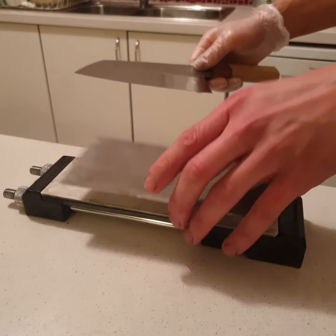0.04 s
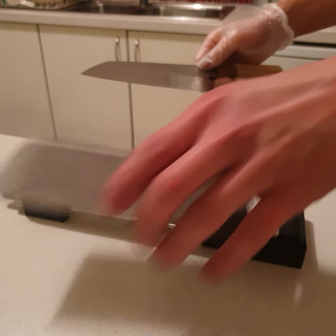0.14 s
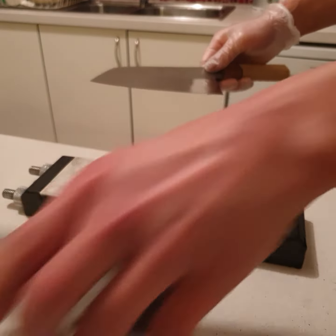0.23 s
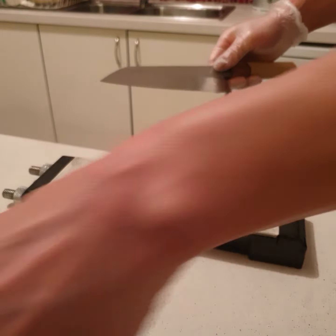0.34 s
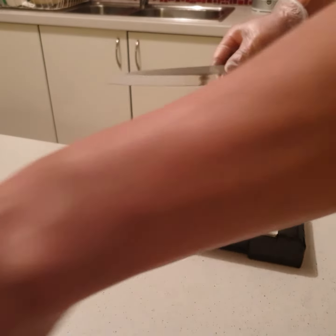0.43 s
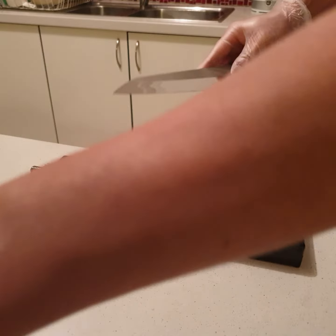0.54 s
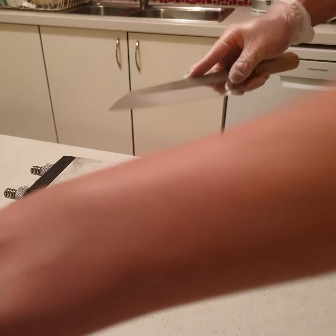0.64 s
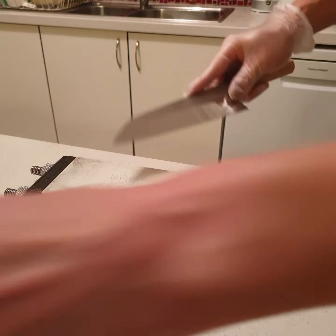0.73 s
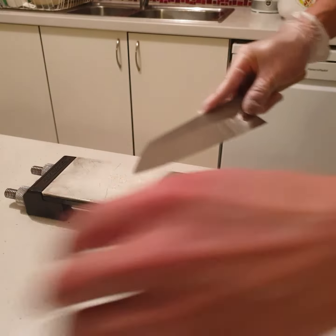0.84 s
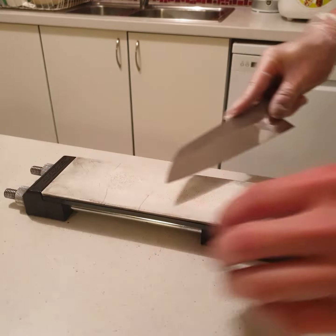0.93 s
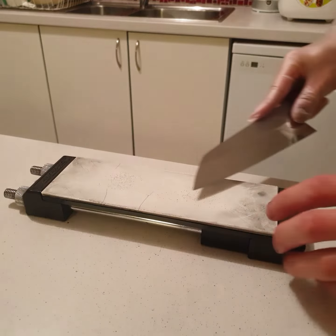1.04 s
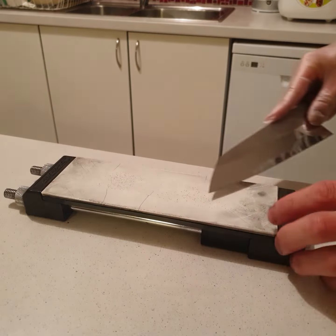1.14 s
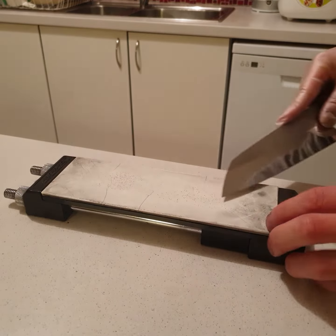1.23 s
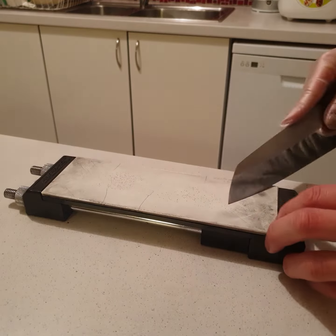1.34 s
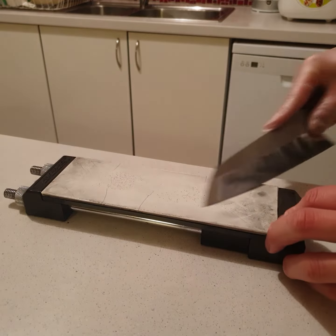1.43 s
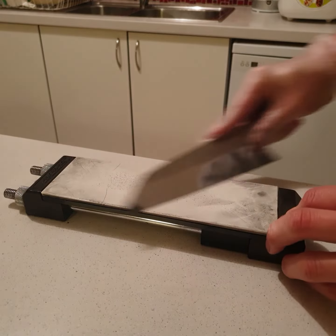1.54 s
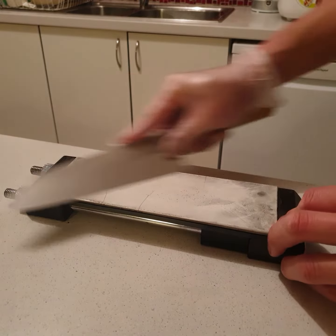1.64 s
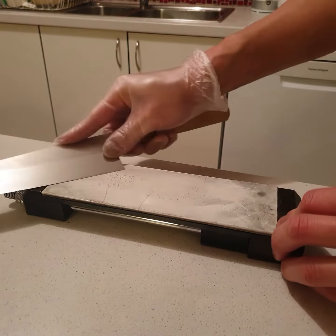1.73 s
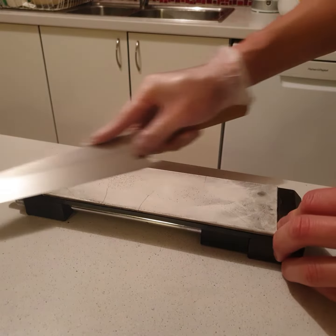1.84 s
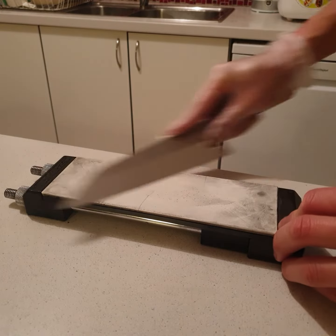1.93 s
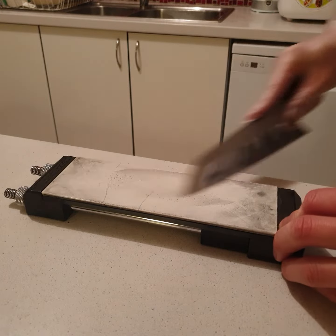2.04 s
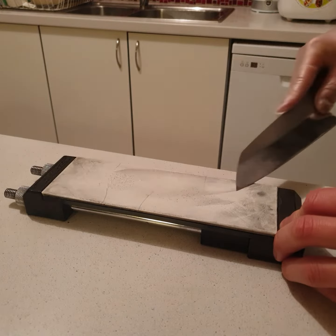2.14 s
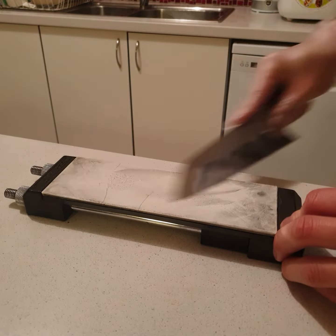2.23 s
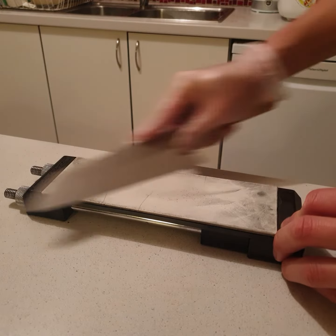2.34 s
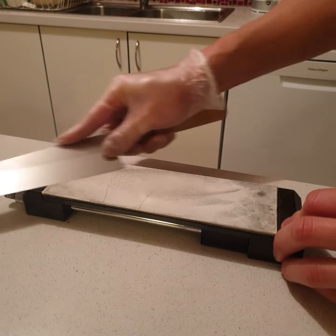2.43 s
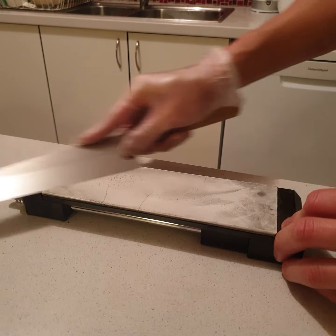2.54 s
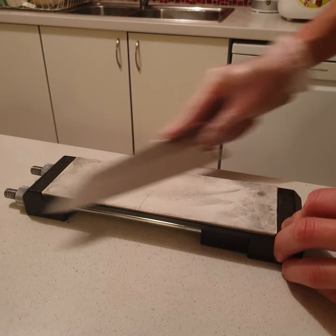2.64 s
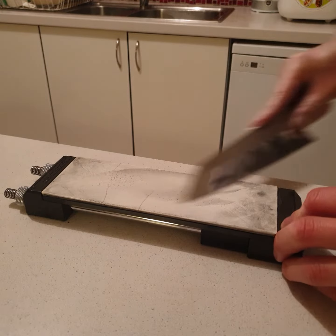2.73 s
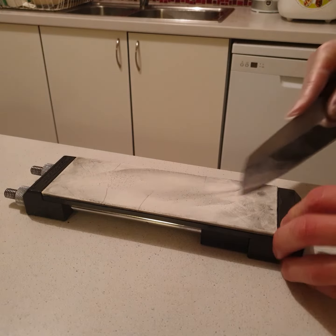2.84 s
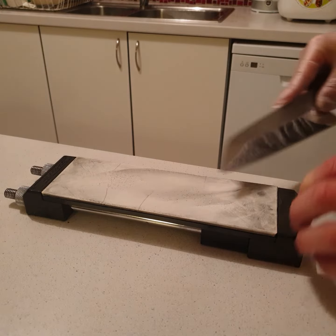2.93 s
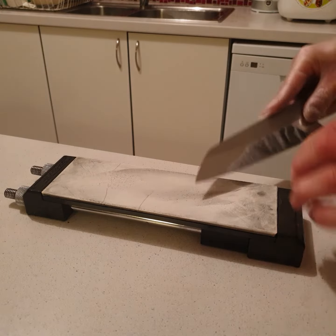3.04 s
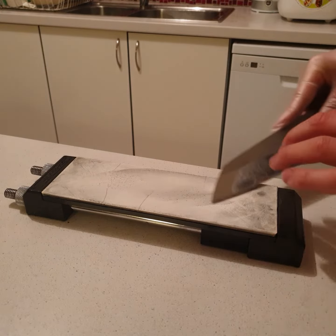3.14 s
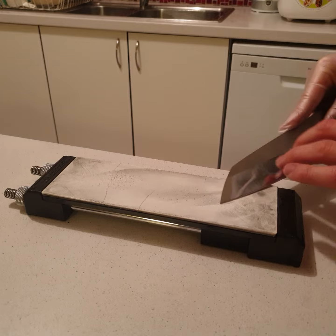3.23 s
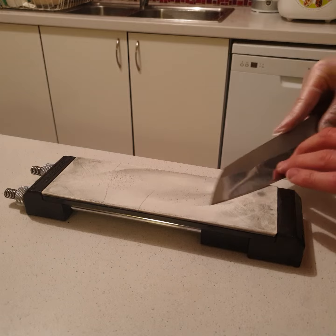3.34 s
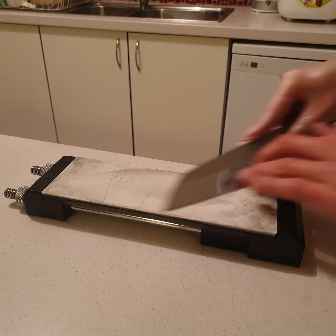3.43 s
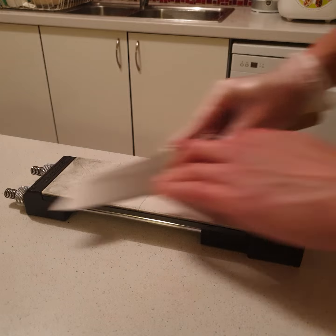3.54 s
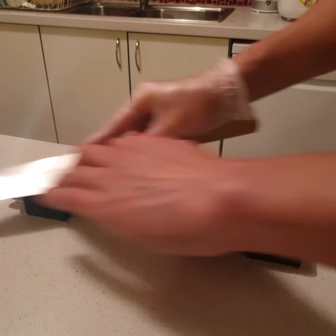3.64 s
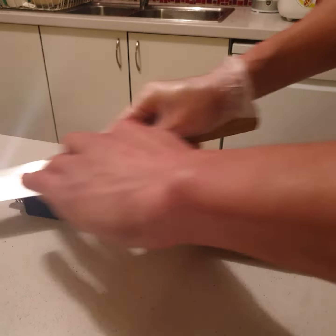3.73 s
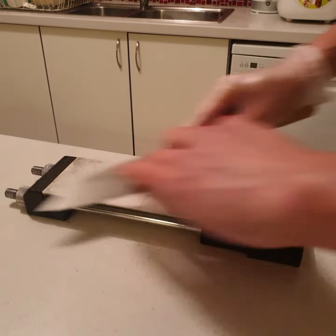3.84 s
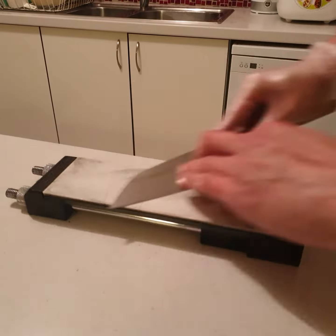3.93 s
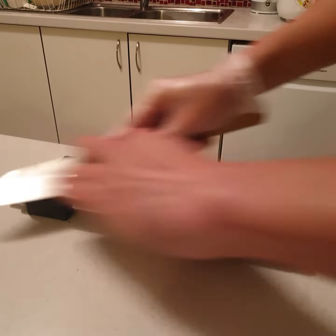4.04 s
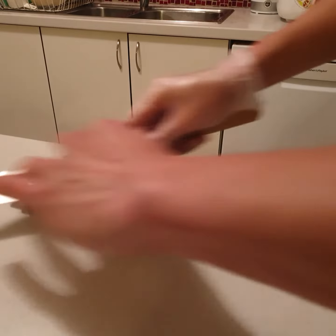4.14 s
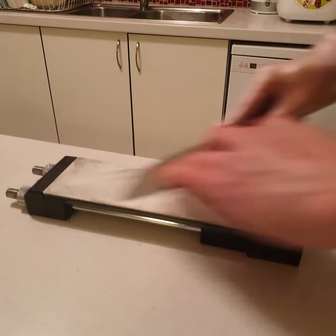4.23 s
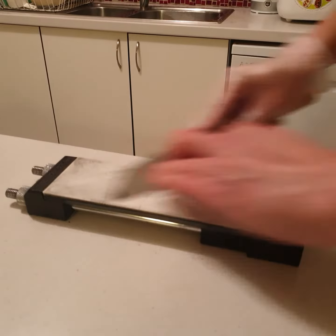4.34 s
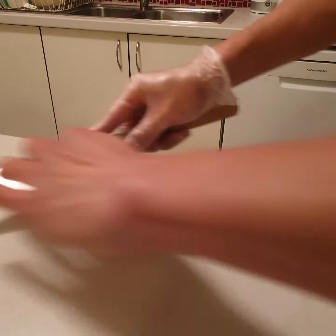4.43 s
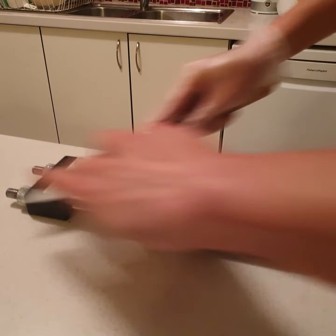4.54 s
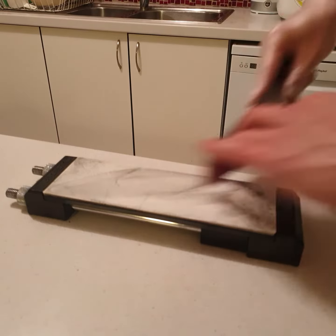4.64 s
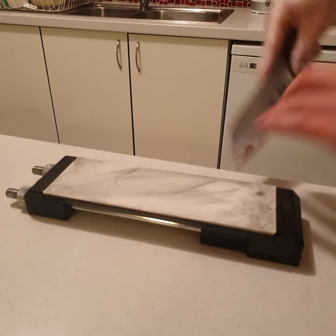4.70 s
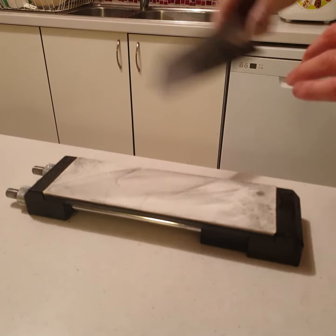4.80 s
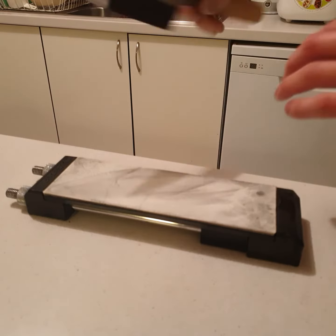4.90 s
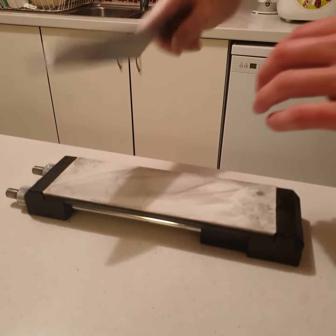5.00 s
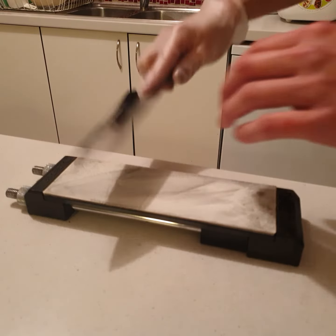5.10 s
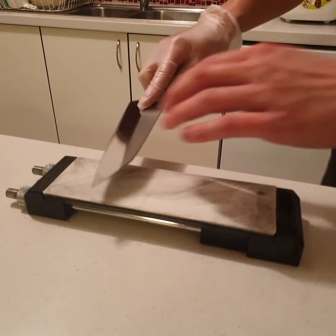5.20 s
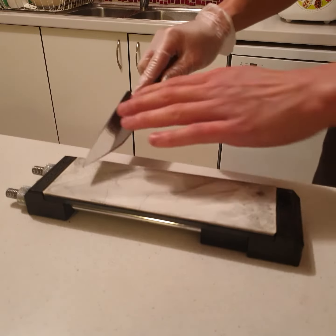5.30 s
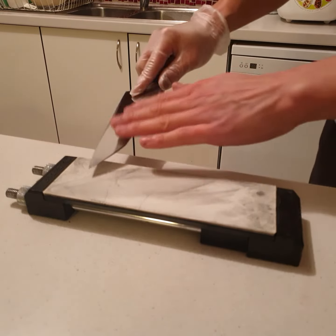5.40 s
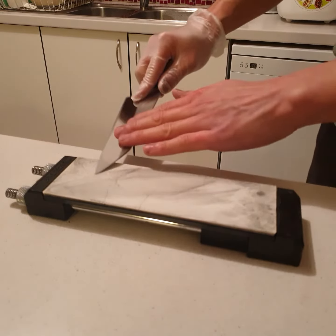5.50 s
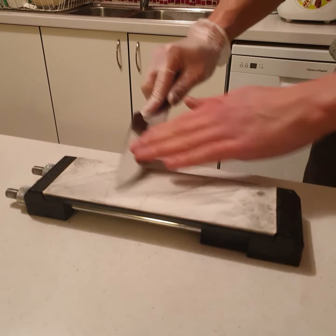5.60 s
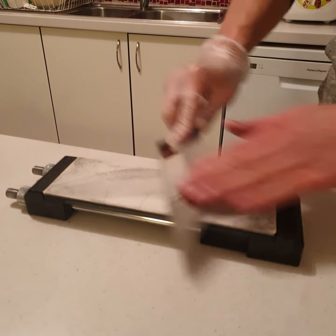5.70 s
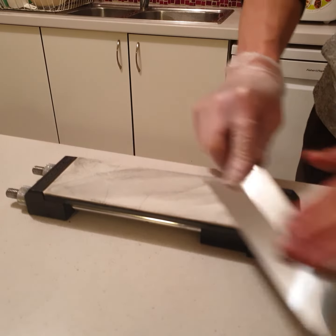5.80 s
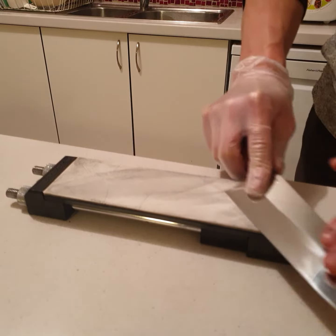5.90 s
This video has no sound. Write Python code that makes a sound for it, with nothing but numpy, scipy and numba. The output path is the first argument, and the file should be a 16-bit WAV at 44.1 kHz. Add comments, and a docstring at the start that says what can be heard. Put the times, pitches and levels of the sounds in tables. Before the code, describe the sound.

A faint low motor hum with slight airy hiss runs throughout a small kitchen with a short, diffuse echo. At about 0.5 s a steel plate strikes the counter on one edge, rings brightly and roughly, then claps flat by 0.6 s, choking the ring; a woody counter boom fades. It is by far the loudest event. Around 1.3 s a knife lightly touches a whetstone. Close, gritty strokes follow at about 1.6, 1.9, 2.3 and 2.6 s: bright hiss with thin metallic singing that glides up and back, plus small edge ticks. After a pause, from 3.45 to 4.7 s, strokes become quick and firm, about five per second, with dull holder bumps beneath. The blade lifts near 4.8 s; clothing rustles softly, with a low bump at 5.0 s. The edge touches down at 5.5 s, ticks at 5.7 s, and a strong short scrape peaks at 5.8 s before the end.

```python
"""Plate put down, knife on a whetstone

A steel flattening plate rings on one edge on a kitchen counter, then drops flat: decaying sines, noise chatter.
A knife is stroked over a whetstone: noisy grit force hisses and drives blade resonances that glide with each stroke.
The edge ticks (noise bursts), the stone's holder bumps (short sines, rumble) and clothes rustle (coloured noise).
An appliance hums (wavering sines, noise) in a small room (decaying noise echo).
"""
import sys
import numpy as np
from scipy import signal
from scipy.fft import rfft, irfft
from scipy.io import wavfile
from numba import njit

SR = 44100
rng = np.random.default_rng(int(sys.argv[2]) if len(sys.argv) > 2 else 0)


def wrap_up_sound(samples):
    """Save the sound to the file named by the first command line argument, as 16-bit audio."""
    columns = np.atleast_2d(samples).T
    # keep every value between -1 and 1, then stretch to whole-number steps
    tamed = np.clip(columns, -1, 1)
    steps = np.round(tamed * 32767).astype(np.int16)
    wavfile.write(sys.argv[1], SR, steps)


N = 262836


def from_db(db):
    """Decibels to gain."""
    return 10 ** (np.asarray(db) / 20)


def rms_one(x):
    """Scale to unit rms."""
    return x / np.sqrt(np.mean(x ** 2) + 1e-20)


def clock():
    """Time of each sample [s]."""
    return np.arange(N) / SR


def curve(rows):
    """Join (time [s], value) rows by straight lines."""
    return np.interp(clock(), *np.transpose(rows))


def at_hz(points, hz):
    """Read (frequency [Hz], value) rows on a log-frequency axis."""
    f, value = np.transpose(sorted(map(tuple, points)))
    return np.interp(np.log(hz + 1e-9), np.log(f), value)


def drift(rate_hz):
    """Random knots joined by straight lines, unit rms."""
    knots = rng.standard_normal(int(rate_hz * N / SR) + 2)
    return rms_one(np.interp(clock() * rate_hz, np.arange(len(knots)), knots))


def pan(db):
    """Left and right gain; db is left over right."""
    return from_db(np.array([[db], [-db]]) / 2)


def colour(x, spectrum):
    """Minimum-phase filter with the given spectrum; white noise keeps its power."""
    size = 2048
    hz = np.arange(size + 1) * SR / size / 2
    cepstrum = irfft(np.log(rms_one(from_db(at_hz(spectrum, hz)))))
    # fold to the causal half
    cepstrum[1:size] *= 2
    cepstrum[size + 1:] = 0
    impulse = irfft(np.exp(rfft(cepstrum)))
    return signal.fftconvolve(x, impulse[None], axes=1)[:, :N]


def bursts(rows):
    """Each contact is a dying noise chatter; rows start (time [s], level [dB], time per 20 dB [s])."""
    out = np.zeros((2, N))
    t = np.arange(SR // 10) / SR
    for s, db, length_s, *_ in rows:
        at = int(s * SR)
        out[:, at:at + len(t)] += from_db(db - 20 * t / length_s) * rng.standard_normal((2, len(t)))
    return out


def swell_db(start_s, hold_s, attack_s, release_s, sag_db=0):
    """Attack, sagging hold and release in dB; attack and release are times per 20 dB."""
    age = clock() - start_s
    slopes = np.maximum(-age, 0) / attack_s + np.maximum(age - hold_s, 0) / release_s
    return -20 * slopes - sag_db * np.clip(age / hold_s, 0, 1)


# motor lines: (frequency [Hz], relative rms level [dB])
HUM_LINES = [(99.6, -86), (174.8, -63), (199.7, -70), (301, -79.5), (349.5, -71), (419, -77.5)]
# motor loudness, shaded by the arms: (time [s], level [dB])
HUM_LEVEL = [(0, -4.5), (.45, 2), (1.2, -1.5), (2.6, 0.5), (3.2, 2), (4.4, 6), (5.96, 4)]
# spectra of motor rush and faint hiss: (frequency [Hz], relative density [dB per Hz])
MOTOR_SPECTRUM = [(25, -21.5), (60, -5.5), (115, -10), (155, 0.5), (230, -5), (300, 1), (410, -2.5),
                  (520, -11.5), (700, -17.5), (1200, -39.5), (2500, -41.5)]
AIR_SPECTRUM = [(530, -37.5), (900, -8), (1090, -6.5), (1720, -13), (2220, -11), (2730, -18.5),
                (5000, -17.5), (8150, -22.5), (14700, -13), (16000, -22)]


def appliance(motor_db=-65, air_db=-80, waver_db=0.5):
    """Sine lines waver in level and phase over a dull noise rush and faint hiss."""
    lines = 0
    for hz, db in HUM_LINES:
        gain = np.sqrt(2) * from_db(db + waver_db * drift(2.4))
        lines = lines + gain * np.sin(2 * np.pi * hz * clock() + .2 * drift(4.9))
    # partly common to both sides
    motor_noise = rng.standard_normal(N) + .35 * rng.standard_normal((2, N))
    rush = rms_one(colour(motor_noise, MOTOR_SPECTRUM))
    air = rms_one(colour(rng.standard_normal((2, N)), AIR_SPECTRUM))
    motor = (lines + from_db(motor_db) * rush) * from_db(curve(HUM_LEVEL)) * pan(1.2)
    return motor + from_db(air_db) * air


# plate meets counter: (time [s], relative level [dB], chatter time per 20 dB [s], share ringing the plate [0-1])
PLATE_HITS = [(0.5169, -13.5, 0.0065, 0.88), (0.5207, -8.5, 0.0085, 0.48), (0.5591, -19.5, 0.023, 0.67),
              (0.5792, -6, 0.0087, 0.67), (0.5831, -14.5, 0.016, .4), (0.5861, -18.5, 0.0071, .1)]
# last corner snaps down: (time [s], relative level [dB], time per 20 dB [s])
PLATE_SNAP = [(0.5926, -4.5, 0.0027)]
# free plate: (frequency [Hz], level [dB])
PLATE_MODES = [(996, -34), (1092, -34.5), (1556, -35.5), (1750, -41.5), (2616, -36), (3080, -40),
               (3528, -35), (3692, -35), (4622, -32.5), (4905, -33.5), (5477, -37), (5706, -34.5),
               (6020, -40), (6240, -38), (6722, -39), (7320, -41), (7635, -40), (10865, -35.5)]
# chatter spectrum: (frequency [Hz], relative density [dB per Hz])
CLACK_SPECTRUM = [(40, -25.5), (100, -17), (280, -4), (500, -2), (1500, -2.5), (2400, -5), (3200, -0.5),
                  (4300, -5), (6200, 2.5), (7500, -1.5), (8500, -13), (11500, -4.5), (16000, -16)]
# counter top: (frequency [Hz], level [dB], T60 before counter_t60_scale [s])
COUNTER_MODES = [(125, -51, 0.3), (172, -41, .3), (273, -27, 0.21), (287.5, -33, 0.39), (335.5, -42, 0.76),
                 (611.5, -48.5, 0.6), (678, -43, .35)]
# blows on the counter: (time [s], level [dB])
COUNTER_BLOWS = [(0.519, -7), (0.58, -9.5), (0.594, 0.5)]
PLATE_FLAT_S, PLATE_DAMPED_T60_S = .585, .05


def plate(clack_db=-4, ring_t60_s=0.95, snap_db=-4, snap_pan_db=12, counter_t60_scale=0.94):
    """The plate rings while it stands on an edge and is choked when it lies flat; the counter booms."""
    t = clock()[:SR * 3 // 2]
    ring, boom = np.zeros((2, N)), np.zeros(N)
    choke = from_db(-60 * np.maximum(t - PLATE_FLAT_S, 0) / PLATE_DAMPED_T60_S)
    for s, _, _, share in PLATE_HITS:
        age = np.maximum(t - s, 0)
        decay = share * (t > s) * from_db(-60 * age / ring_t60_s) * choke
        for hz, level_db in PLATE_MODES:
            phase = rng.uniform(0, 2 * np.pi) + rng.normal(0, .6, (2, 1))
            ring[:, :len(t)] += from_db(level_db) * decay * np.sin(2 * np.pi * hz * age + phase)
    for s, db in COUNTER_BLOWS:
        age = np.maximum(t - s, 0)
        for hz, level_db, t60_s in COUNTER_MODES:
            gain = from_db(db + level_db - 60 * age / (t60_s * counter_t60_scale))
            boom[:len(t)] += gain * np.sin(2 * np.pi * hz * age)
    clack = from_db(clack_db) * colour(bursts(PLATE_HITS), CLACK_SPECTRUM)
    snap_spectrum = [(500, -15.5), (5000, -7), (8500, -4.5), (11500, 2), (16000, -1)]
    snap = from_db(snap_db) * colour(bursts(PLATE_SNAP), snap_spectrum)
    thud = signal.sosfilt(signal.butter(2, 130, "high", fs=SR, output="sos"), boom)
    # the standing edge buzzes against the counter and roughens the ring
    ring = ring * from_db(2.2 * drift(320))
    return clack * pan(3) + thud + snap * pan(snap_pan_db), ring * pan(4.5)


# room decay: (frequency [Hz], T60 [s])
ROOM_T60 = [(100, .4), (300, 0.49), (1500, 0.54), (5000, 0.46), (8000, 0.33), (15000, 0.31)]


def kitchen(x, first_echo_s=0.003):
    """Diffuse echoes from cupboards and tiles: noise bands, the treble dying fastest."""
    t = np.arange(SR * 3 // 4) / SR
    white, tail = rfft(rng.standard_normal((2, len(t)))), 0
    hz, centres = np.fft.rfftfreq(len(t), 1 / SR), [f for f, _ in ROOM_T60]
    for weights, (_, t60_s) in zip(np.eye(len(centres)), ROOM_T60):
        band = irfft(white * np.interp(hz, centres, weights), len(t))
        tail = tail + band * from_db(-60 * t / t60_s)
    tail = tail * (t > first_echo_s)
    return signal.fftconvolve(x, tail / np.sqrt(np.sum(tail ** 2) / 2), axes=1)[:, :N]


@njit
def resonate(x, hz, width, sr):
    """Two-pole resonance with moving centre and width [Hz], unit gain on top."""
    y = np.zeros(len(x))
    for i in range(2, len(x)):
        r = 1 - np.pi * width[i] / sr
        drive = (1 - r * r) / 2 * (x[i] - x[i - 2])
        y[i] = drive + 2 * r * np.cos(2 * np.pi * hz[i] / sr) * y[i - 1] - r * r * y[i - 2]
    return y


def blade_mode(force, hz, width_hz):
    """One moving resonance swells and fades as the contact passes its nodes; white noise keeps its power."""
    swell = from_db(3.0 * drift(18))
    width = width_hz + np.zeros(N)
    sides = [resonate(side * swell, hz, width, SR) for side in force]
    return np.array(sides) / np.sqrt(np.pi * width / SR)


# strokes: (up to speed [s], hold [s], attack per 20 dB [s], relative hiss [dB], relative blade ring [dB],
#   sag over the hold [dB], damping of the lowest mode [dB], top of the glide [s], top of the glide [Hz])
STROKES = [(1.576, .13, 0.19, -43.5, -55, -2, -1, 1.635, 1480),
           (1.881, 0.21, 0.02, -49, -56.5, 7.5, -0.5, 1.975, 1493),
           (2.242, 0.049, .06, -57, -80, -2, 0, 2.24, 1050),
           (2.298, 0.14, 0.01, -47, -51.5, 3, 3.5, 2.335, 1516),
           (2.597, 0.2, .058, -44.5, -53, 10, -0.5, 2.675, 1507),
           (3.465, 0.082, .01, -49, -63.5, 1.5, -7, 3.43, 1290),
           (3.551, 0.068, .07, -48, -60, 1, -3.5, 3.605, 1590),
           (3.81, 0.091, 0.01, -44.5, -51.5, 1, -2.5, 3.845, 1690),
           (3.999, 0.083, 0.04, -44.5, -51, -0.5, -0.5, 4.04, 1640),
           (4.202, 0.075, 0.07, -46, -53, -1.5, 0.5, 4.25, 1640),
           (4.362, 0.089, .04, -40, -46.5, 4, 4, 4.41, 1590),
           (4.562, 0.13, 0.13, -43, -51.5, 1, 2, 4.595, 1610),
           (5.778, 0.044, .24, -38.5, -50, 1, 5.5, 5.8, 1543),
           (5.942, 0.036, 0.65, -55, -61, 0, -0.5, 5.96, 1410)]
# knife lies on the stone and drags lightly: (from [s], until [s], relative hiss [dB])
RESTS = [(1.337, 2.88, -70.5), (3.28, 4.8, -64.5), (5.486, 5.96, -66)]
LAND_S, LIFT_S = .006, .07  # per 20 dB
REST_RING_DB = -22  # blade ring relative to hiss
RELEASE_S, RELEASE_PER_HOLD = 0.046, 0.37  # per 20 dB; longer strokes run out more slowly
RING_STEEPNESS = 1.27  # dB of ring per dB of hiss: a light touch hardly bends the blade


def drag():
    """Gains of grit hiss and blade ring: each stroke swells out of the light drag of the resting knife."""
    touching = np.array([swell_db(start, end - start, LAND_S, LIFT_S) for start, end, _ in RESTS])
    hiss_levels = [db + touch for (*_, db), touch in zip(RESTS, touching)]
    ring_levels = [level + REST_RING_DB for level in hiss_levels]
    for start, hold, attack, hiss_db, ring_db, sag_db, *_ in STROKES:
        release = RELEASE_S + RELEASE_PER_HOLD * hold
        shape = swell_db(start, hold, attack, release, sag_db) + touching.max(axis=0)
        hiss_levels.append(hiss_db + shape)
        ring_levels.append(ring_db + RING_STEEPNESS * shape)
    # the loudest layer wins
    hiss, ring = np.max(hiss_levels, axis=0), np.max(ring_levels, axis=0)
    return from_db(hiss) + 1e-12, from_db(ring) + 1e-12


TURN_HZ = 1010  # lowest mode where the stroke turns round
GLIDE_S, GLIDE_PER_HOLD = .055, 0.18  # arch half width; longer strokes glide more slowly


def glide():
    """The lowest mode arches up and back as the contact travels the edge; ratio to its listed pitch."""
    arches = []
    for _, hold, *_, top_s, top_hz in STROKES:
        half_width = GLIDE_S + GLIDE_PER_HOLD * hold
        arches.append((top_hz - TURN_HZ) * np.exp(-((clock() - top_s) / half_width) ** 2))
    return (TURN_HZ + np.max(arches, axis=0)) / BLADE_MODES[0][0]


CLIMB_DB, CLIMB_PER_S = 3, 1.5  # limit of the gain change; glide rate that sets its slope


def lowest_mode_gain():
    """The lowest mode sings while its pitch climbs and is choked as it falls; damping varies by stroke."""
    damping_db = curve([(start, db) for start, *_, db, _, _ in STROKES])
    climb = np.gradient(glide()) * SR
    return from_db(CLIMB_DB * np.tanh(climb / CLIMB_PER_S) - damping_db)


# blade on the stone: (frequency [Hz], width [Hz], relative level [dB], share of the lowest mode's glide [0-1])
BLADE_MODES = [(1400, 55, 0, 1.0), (2020, 110, -1.5, .5), (2780, 110, -.5, .18), (3430, 180, -.5, .25),
               (4220, 220, 4.5, .14)]


def low_modes(force):
    """Bending modes rise as the stone pins the edge and jitter as it rocks; a little grit sounds between."""
    shift = glide()
    rock, grit_share = .011, .2
    modes = []
    for hz, width_hz, db, follow in BLADE_MODES:
        moving_hz = hz * shift ** follow * (1 + rock * drift(35))
        modes.append(from_db(db) * blade_mode(force, moving_hz, width_hz))
    ring = lowest_mode_gain() * modes[0] + sum(modes[1:])
    grit = signal.sosfilt(signal.butter(2, [1700, 4800], "band", fs=SR, output="sos"), force)
    both = ring / np.linalg.norm(from_db(np.array(BLADE_MODES)[:, 2])) + grit_share * grit
    # the narrow blade radiates little bass
    return signal.sosfilt(signal.butter(3, 900, "high", fs=SR, output="sos"), both)


# steel grinding on grit: (frequency [Hz], relative density [dB per Hz])
GRIT_SPECTRUM = [(200, -30), (2300, -30), (3400, -13), (4700, -4.5), (7000, -.5), (8400, -8), (11500, -4),
                 (13500, -4.5), (16000, -7.5)]


def high_modes(force, tip_bright_db=5, count=20):
    """Upper modes ring bright and clear under the tip and blur into hiss as the whole edge lies down."""
    free_width_hz, damping_hz, grit_share = 70, 360, .75
    contact, shift = curve(CONTACT), glide()
    centres_hz = np.linspace(4700, 15500, count) + rng.uniform(-200, 200, count)
    follow = rng.uniform(.08, .24, count)
    width_hz, ring = free_width_hz + damping_hz * contact ** 2, 0
    for hz, pull in zip(centres_hz, follow):
        moving_hz = hz * shift ** pull * (1 + .022 * contact * drift(30))
        gain = from_db(tip_bright_db * (1 - contact) * np.log2(hz / centres_hz.mean()))
        # waves run along the blade before they radiate, so the modes do not line up
        travel = rng.integers(0, SR // 1000)
        delayed = np.pad(gain * force, ((0, 0), (travel, 0)))[:, :N]
        ring = ring + blade_mode(delayed, moving_hz, width_hz)
    grit = grit_share * (.5 + .5 * contact) * force
    return colour(ring / np.sqrt(count) + grit, GRIT_SPECTRUM)


# edge on the stone: (time [s], share [0 = tip only, 1 = whole edge])
CONTACT = [(1.54, 0.081), (1.6, 0.62), (2.05, .9), (2.09, 0), (2.26, 0), (2.33, 0.79), (2.78, 0.8),
           (2.87, .13), (3.46, 0.097), (3.54, 0.67), (4.7, .8), (5.8, 0.6)]
# edge touches or catches on the stone: (time [s], relative level [dB], time per 20 dB [s])
TICKS = [(1.3375, -60, 0.02), (1.556, -32.5, .034), (1.582, -30, .018), (1.8763, -43, 0.036),
         (2.0873, -37.5, 0.038), (2.2889, -32.5, 0.027), (2.4415, -35.5, .01), (2.5652, -47, .016),
         (2.7064, -31, .0045), (2.852, -48, 0.033), (3.2811, -58, .02), (3.4595, -29.5, 0.0096),
         (3.5545, -25.5, 0.0035), (3.8029, -34, 0.013), (3.98, -38, .013), (4.3696, -26, 0.011),
         (4.7787, -44.5, 0.034), (4.8121, -42, .012), (5.4871, -37, 0.01), (5.7071, -28, 0.0064),
         (5.728, -34, .012)]


def knife(hiss_db=-2.5, ring_db=-1.0, tick_db=-5.5, tick_ring_db=-15, tip_pan_db=-6, edge_pan_db=1.1):
    """Grains break under the edge; the drag judders and shakes the blade. The tip touches on the right."""
    grains_per_s, grain_spread_db, grain_share, judder_db = 1500, 3.0, .6, 1.3
    grain_gain = from_db(grain_spread_db * np.minimum(rng.exponential(1, N), 4))
    grains = (rng.random(N) < grains_per_s / SR) * grain_gain
    rough = rng.standard_normal((2, N)) * (1 + grain_share * rms_one(grains))
    force = rms_one(rough) * from_db(judder_db * drift(130))
    hiss, ring = drag()
    contact, ticks = curve(CONTACT), bursts(TICKS)
    treble = high_modes(from_db(hiss_db) * hiss * force + from_db(tick_db) * ticks)
    # a light touch of the tip hardly bends the blade
    bending_ticks = from_db(tick_ring_db) * (0.13 + contact) * ticks
    bending = low_modes(from_db(ring_db) * ring * force + bending_ticks)
    balance_db = tip_pan_db + (edge_pan_db - tip_pan_db) * contact
    return (treble + bending * pan(-1.3)) * from_db(np.array([balance_db, -balance_db]) / 2)


# holder bumps on the counter, hardest where quick strokes turn: (time [s], level [dB], frequency [Hz])
BUMPS = [(1.345, -47, 200.5), (1.42, -41.5, 126), (2.167, -43.5, 148), (2.53, -50, 150),
         (3.524, -36.5, 200), (3.596, -39.5, 200), (3.902, -37.5, 202), (3.956, -33.5, 165),
         (4.137, -26, 196), (4.322, -28.5, 180), (4.501, -29.5, 181), (5.018, -38.5, 89), (5.494, -44, 150),
         (5.919, -43, 162)]
RUMBLE_T60_S, RUMBLE_AT_HZ, RUMBLE_SLOPE = .25, 190, 1.43  # deeper bumps rumble for longer


def holder(swell_s=0.0038, rattle_db=-10):
    """Rubber feet give a soft, short sine push, then the counter rumbles on."""
    out, t = np.zeros(N), np.arange(SR // 2) / SR
    rumble_band = signal.butter(2, [55, 250], "band", fs=SR, output="sos")
    for s, db, hz in BUMPS:
        t60_s = RUMBLE_T60_S * (RUMBLE_AT_HZ / hz) ** RUMBLE_SLOPE
        push = np.exp(-((t - 1.1 * swell_s) / swell_s) ** 2) * np.sin(2 * np.pi * hz * t)
        rumble = rms_one(signal.sosfilt(rumble_band, rng.standard_normal(len(t))))
        bump = from_db(db) * (push + rumble * from_db(rattle_db - 60 * t / t60_s))
        at = int(s * SR)
        out[at:at + len(t)] += bump[:N - at]
    return signal.sosfilt(signal.butter(4, 380, fs=SR, output="sos"), out) * pan(1.9)


# fabric spectrum before tilt: (frequency [Hz], relative density [dB per Hz])
CLOTH_SPECTRUM = [(250, -7), (500, -0.5), (1900, -1), (3200, -9.5), (7000, -8), (8400, -18.5),
                  (12000, -16.5), (16000, -20)]
# sleeve swishes: (time [s], hold [s], attack per 20 dB [s], level [dB], brightness [dB per octave])
SWISHES = [(3.585, .025, 0.1, -52.5, -2.5), (4.583, 0.062, 0.46, -60, -1.5), (4.833, 0.024, 0.06, -56.5, 2),
           (4.933, .15, .08, -57, 1.9), (5.23, 0.056, 0.16, -64.5, -1.5), (5.389, .11, 0.09, -53, -1.5)]
SWISH_RELEASE_S = 0.13  # per 20 dB


def clothes(level_db=0.0):
    """Fabric slides softly as arms and body shift: noise swishes, each with its own brightness."""
    crinkle_db = 1.0
    # partly common to both sides
    rub, out = rng.standard_normal((2, N)) + 0.51 * rng.standard_normal(N), 0
    for start, hold, attack, db, tilt in SWISHES:
        tilted = [(hz, level + tilt * np.log2(hz)) for hz, level in CLOTH_SPECTRUM]
        envelope_db = db + swell_db(start, hold, attack, SWISH_RELEASE_S)
        out = out + rms_one(colour(rub, tilted)) * from_db(envelope_db)
    return out * from_db(level_db + crinkle_db * drift(70))


def scene(clack_room_db=-6, ring_room_db=-12, knife_room_db=-11):
    """Plate, knife and holder excite the room; clothes and appliance are added dry."""
    hum = appliance()
    knocks, ring = plate()
    work = knife() + holder()
    sends = from_db(clack_room_db) * knocks + from_db(ring_room_db) * ring + from_db(knife_room_db) * work
    return knocks + ring + work + kitchen(sends) + clothes() + hum


CUTOFF_HZ = 15800


def record(dry):
    """The highest peaks are rounded and the top is cut steeply."""
    ceiling = .85
    rounded = dry / (1 + (dry / ceiling) ** 4) ** .25
    return signal.sosfilt(signal.ellip(10, .2, 80, CUTOFF_HZ, fs=SR, output="sos"), rounded)


dry = scene()
out = record(dry)
wrap_up_sound(out)
```